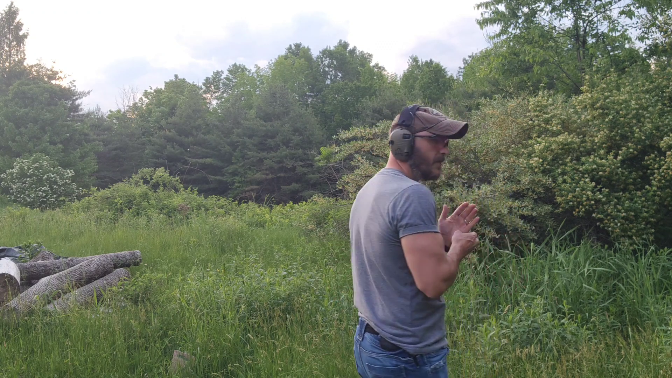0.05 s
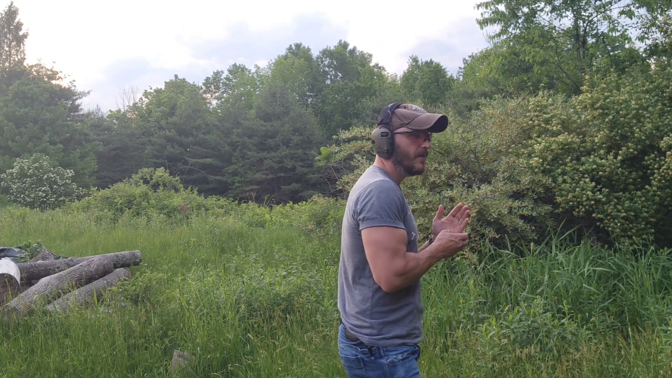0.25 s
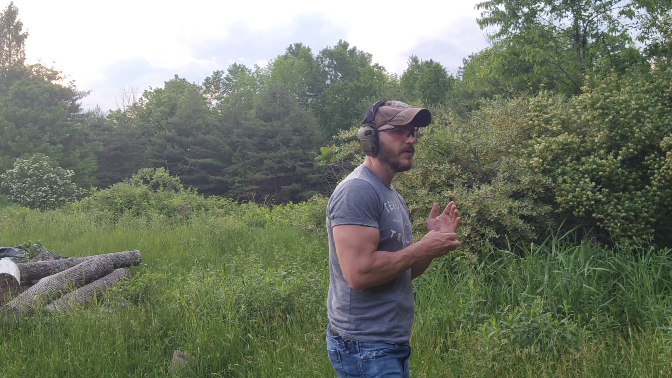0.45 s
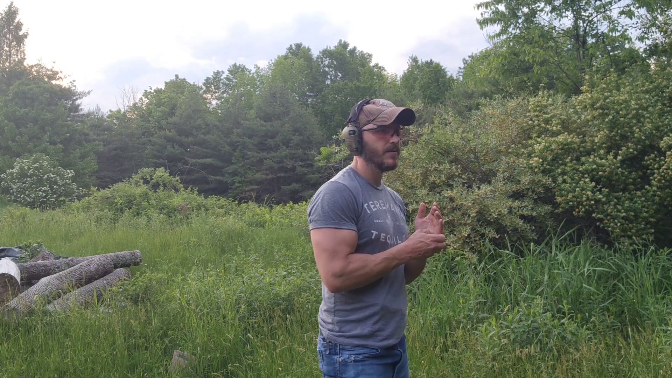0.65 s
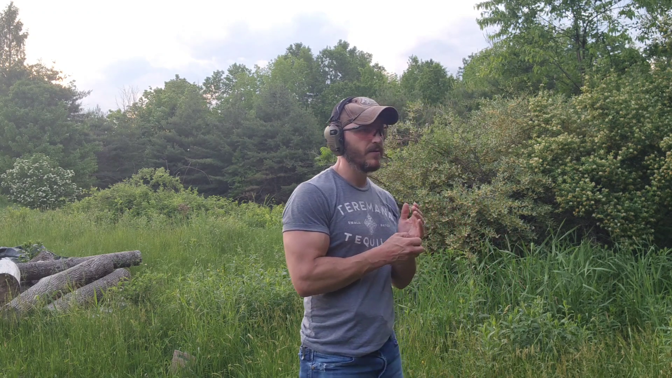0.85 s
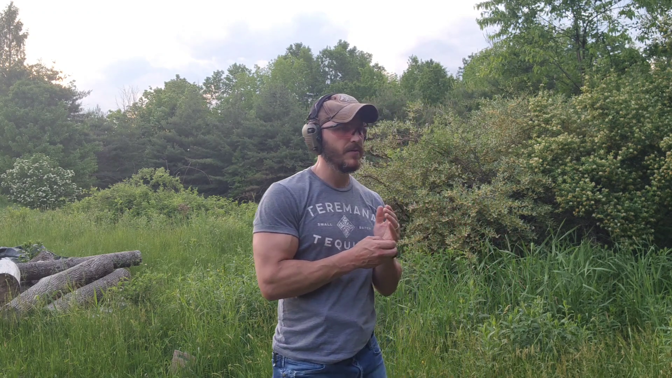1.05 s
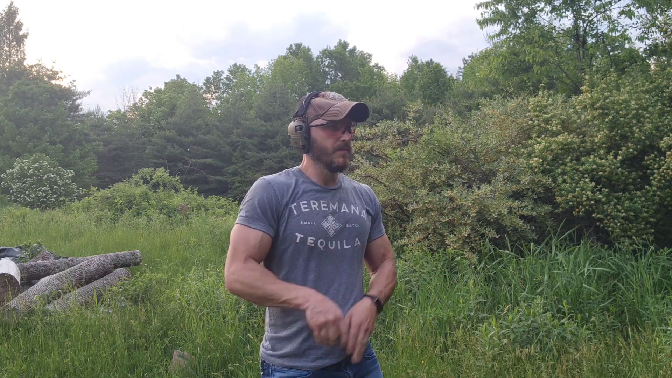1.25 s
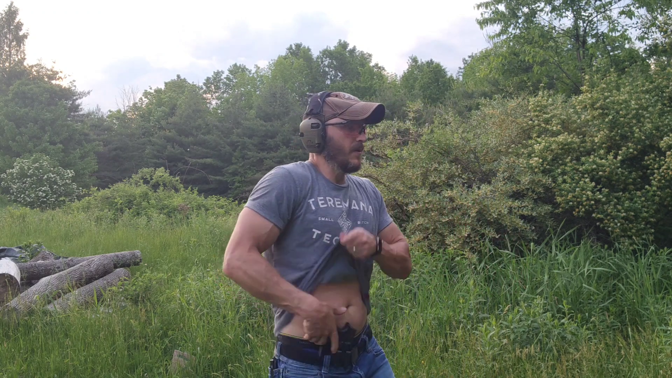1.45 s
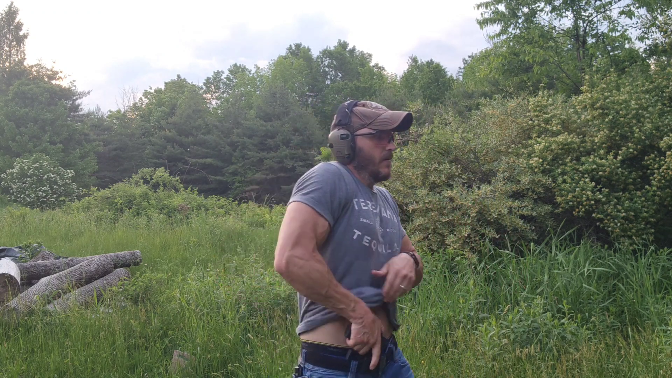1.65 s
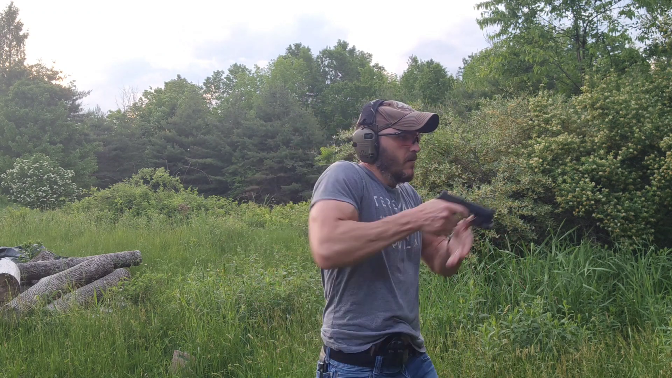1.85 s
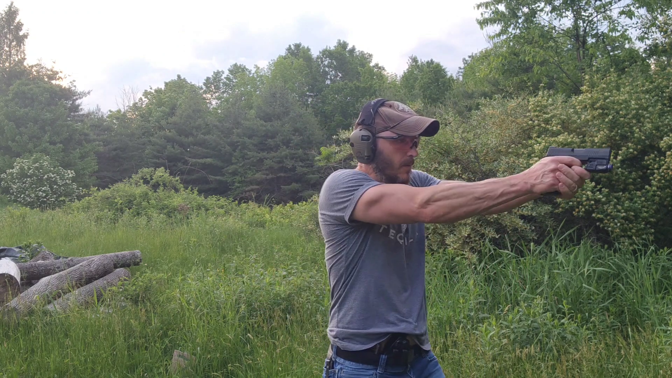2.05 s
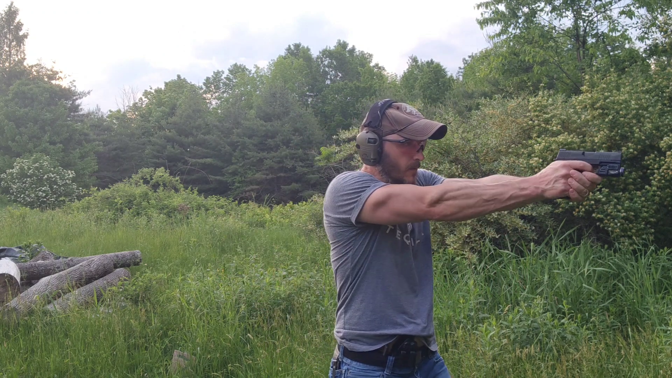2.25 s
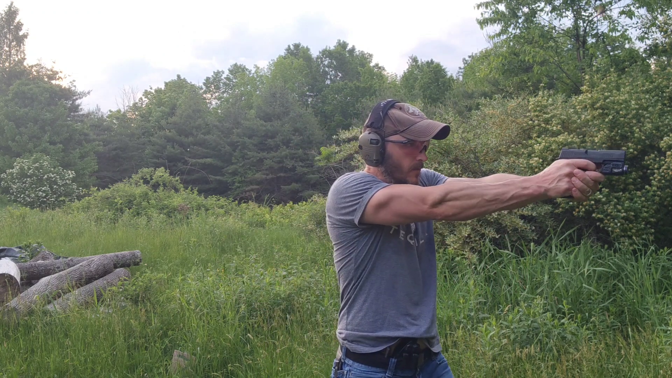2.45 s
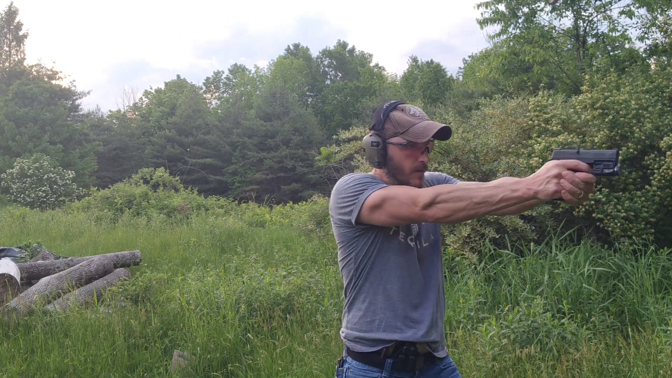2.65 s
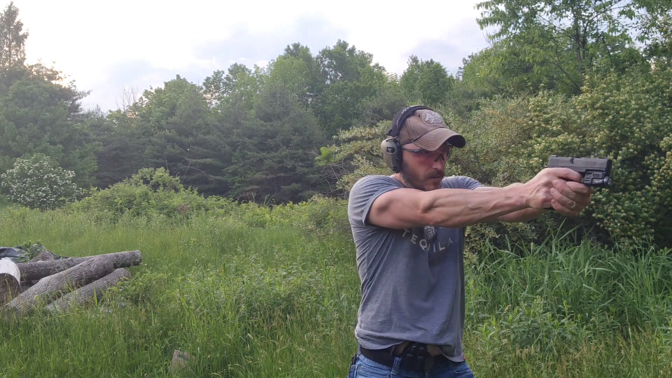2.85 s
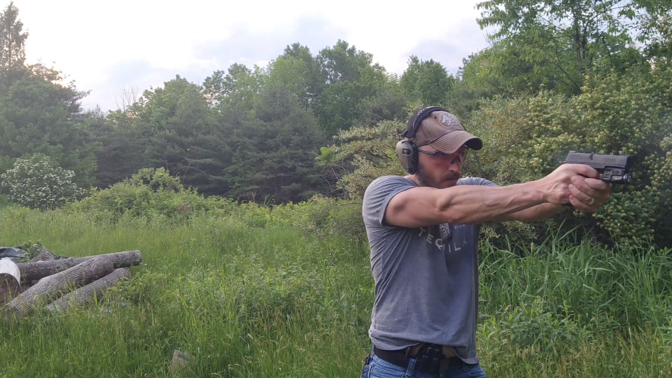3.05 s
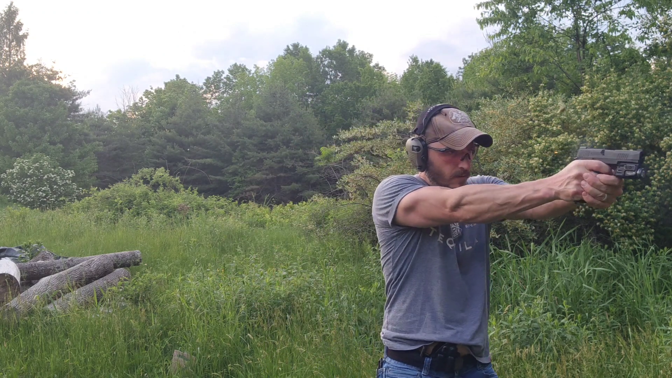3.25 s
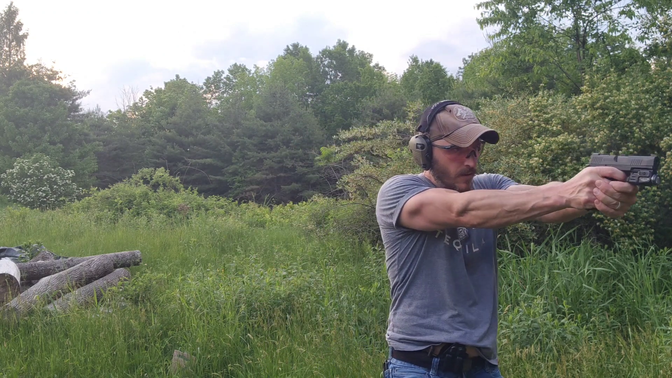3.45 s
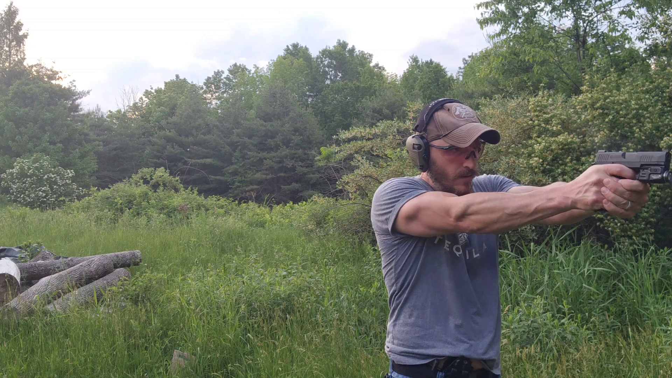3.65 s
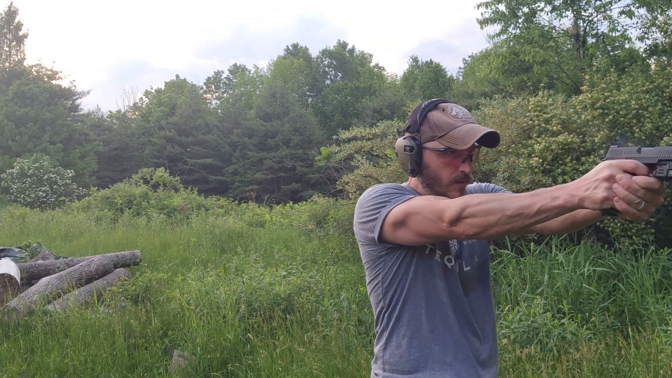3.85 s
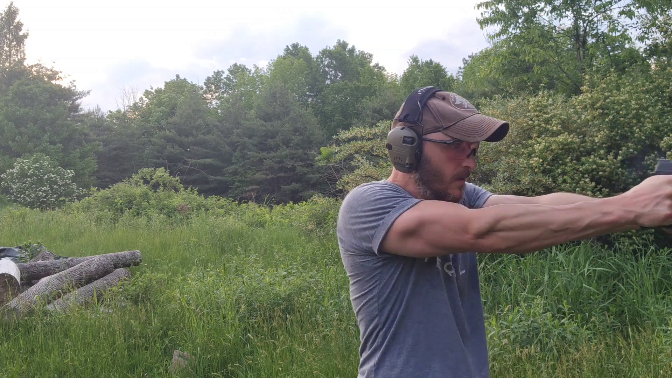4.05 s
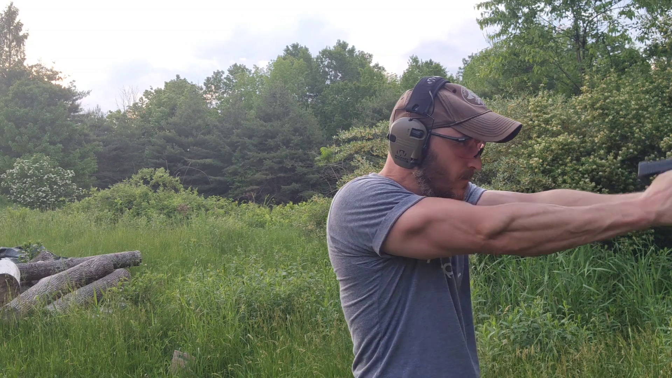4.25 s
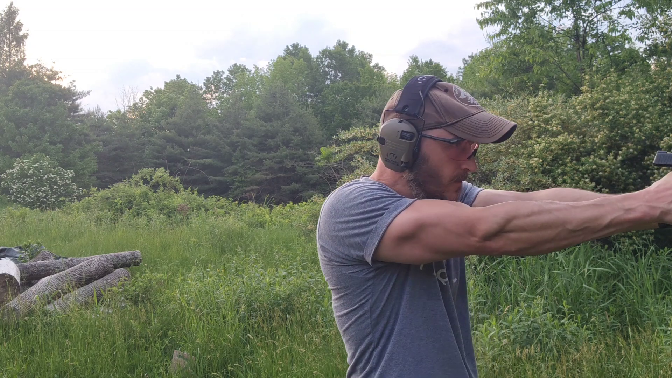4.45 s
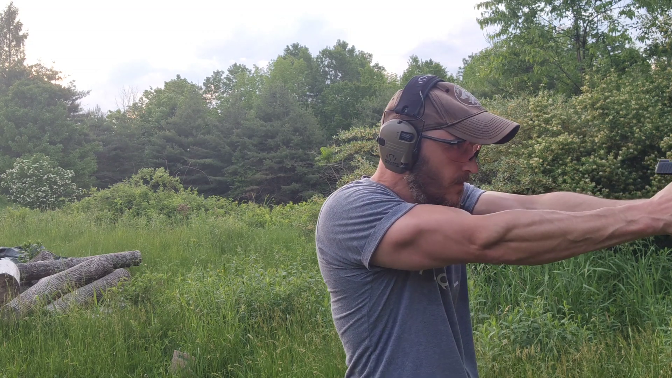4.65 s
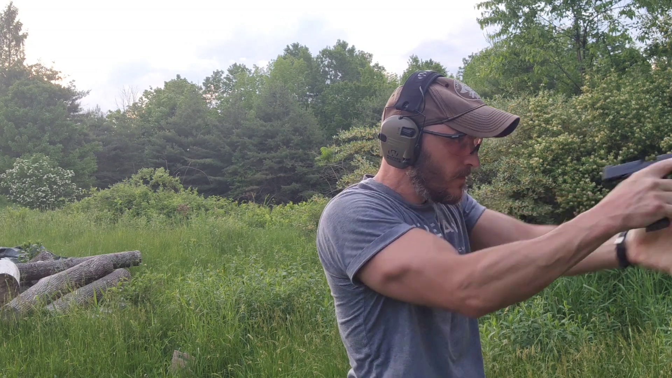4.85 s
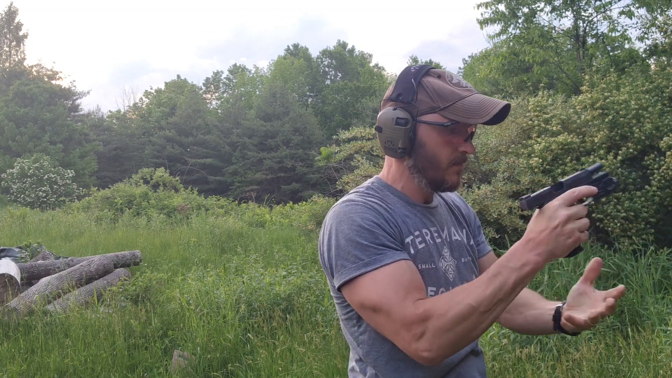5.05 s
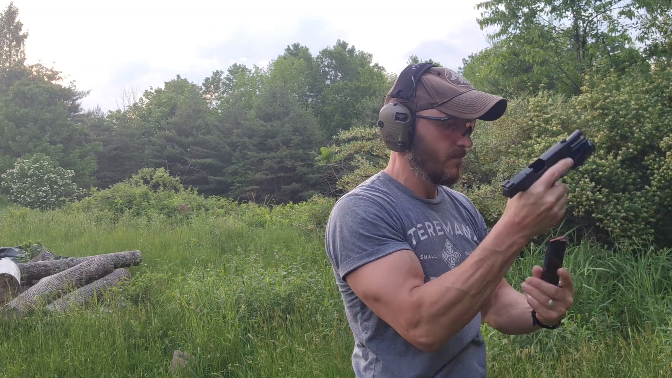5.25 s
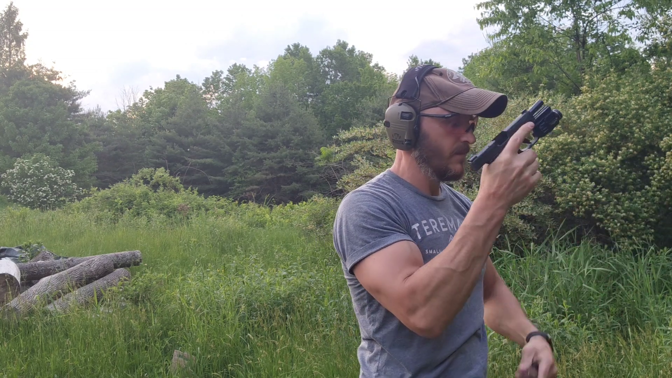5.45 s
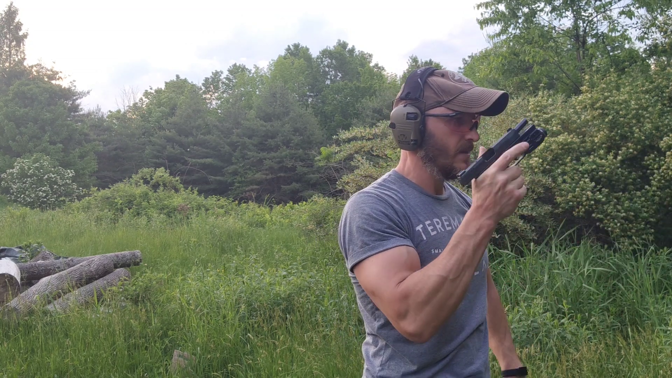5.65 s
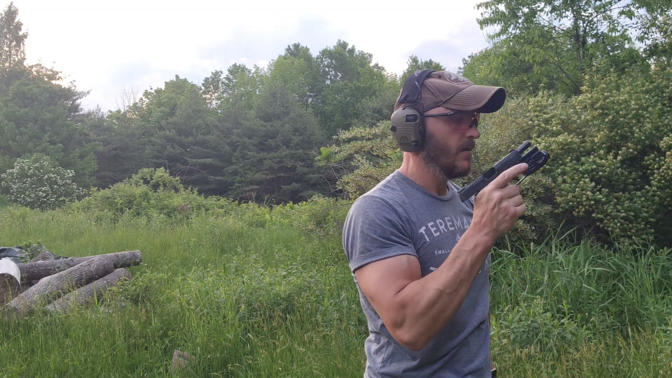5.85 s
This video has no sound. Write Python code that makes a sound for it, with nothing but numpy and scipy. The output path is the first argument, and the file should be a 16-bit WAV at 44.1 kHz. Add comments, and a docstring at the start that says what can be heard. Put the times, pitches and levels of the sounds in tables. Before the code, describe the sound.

In a tree-ringed meadow, soft fabric rubbing and hollow plastic-like clacks precede a quick, slightly uneven string of seven pistol reports. Each has a hard crack, a low thump stronger on the right and a noisy woodland return. The last tail decays under a few light metal clicks. The nearby small stereo microphone clips, its gain dropping at once and recovering slowly.

```python
"""In a meadow ringed by trees, seven pistol shots are fired close to a small stereo camera.
Each is a shock front with gas noise; bushes, trunks, banks, trees and slopes return it as decaying noise and rings.
Before them the gun scrapes and knocks out of a stiff holster; ticks of magazine and slide follow the fourth and last.
A far engine drones as wavering sines, cloth rustles as swelling noise, and open air hushes softly.
The camera's gain drops at once on loud peaks and creeps back."""
import sys
import numpy as np
from scipy import signal
from scipy.fft import rfft, irfft, next_fast_len
from scipy.io import wavfile
from scipy.ndimage import uniform_filter1d, map_coordinates

SR = 44100
rng = np.random.default_rng(int(sys.argv[2]) if len(sys.argv) > 2 else 0)


def store_wav(level_fs):
    """Save 16-bit WAV to argv[1]."""
    pcm = np.round(np.clip(np.atleast_2d(level_fs), -1, 1) * 32767)
    wavfile.write(sys.argv[1], SR, pcm.T.astype(np.int16))


N = 260631
T = np.arange(N) / SR  # time axis, s

# Shots: [t/s, report level/dB, body shelf level/dB, right-port thump level/dB, thump f/Hz,
#         low swell level/dB, bright swell level/dB, swell duration t/s]
SHOT_ROWS = [(2.3666, 12, 0.5, 6.5, 210, 10.5, 0.5, .03), (2.5567, 9.5, -5, -10.5, 240, -23, -3, .012),
             (3.028, 7, 1.5, 10, 198, -4.5, -5, .014), (3.2456, 6, 0.5, 6, 111, 1, -19.5, .014),
             (3.567, 7, 5, 8.5, 174, -7, -12.5, 0.014), (3.8127, 6.5, 2.5, 5, 126.2, -14.5, -11, 0.0091),
             (4.2884, 5, 5, 7.5, 180, -4.5, -11, 0.019)]
# Trunks and banks, and the nearest reflector: [delay t/s, level/dB, left-right level/dB]
TRUNK_ECHOES = [(0.048, -2, 7.5), (.082, 7.5, -1), (.1205, 10, 1), (.128, 2.5, 1), (.149, 6, -1.5),
                (.167, -0.5, 3), (.21, 3, 5), (.227, 3, 7), (.248, 2.5, -1.5)]
NEAREST_ECHO = (0.0197, 7.9, 13)
# Scattered sound, from muzzle gas and bushes to trees, far wood edge and distant slopes:
# [f/Hz, level/dB, decay t60/s, left-right level/dB]
BLAST_DECAY = [(100, -17, 0.18, -17), (550, -2, 0.056, 6.5), (2000, -3.5, 0.039, -2.5),
               (4485, -9.5, 0.092, 9), (7100, -15, 0.062, 0.5), (16000, -8, 0.09, 5.5)]
BUSH_DECAY = [(100, -24.5, 1, 1), (496, -14.5, 0.27, -9), (2060, -14, 0.48, 13), (5300, -2.5, 0.28, 1.5),
              (16000, -3.5, 0.2, 0)]
TREE_DECAY = [(40, -41, 4, 1), (112, -25, 1.2, -7.5), (312, -14.5, 1.1, 3.5), (554, -17.5, 3.4, 0.5),
              (960, -18.5, 2.85, 2.5), (1540, -29, 2.6, 2), (2280, -27.5, 1.96, 6.5),
              (5100, -25.5, 1.57, 8), (8250, -25.5, 0.92, -4.5), (16024, -28.5, .6, 6)]
EDGE_DECAY = [(297.6, -52, 0.9, 3.5), (997, -50, 0.83, -15), (3130, -41.5, 0.97, 15.5),
              (5640, -40, 0.35, 0), (8000, -54.5, 0.35, -3.5), (16000, -59.5, .5, 5)]
HILL_DECAY = [(60, -61.5, 5.4, -10.5), (150, -56, 7.9, 1), (353, -36.5, 6.01, -2), (600, -30.5, 1.2, -1),
              (1190, -42, 2.9, 3), (3300, -44.5, 4.4, 4.5), (7500, -56.5, 4.8, 1.5), (16040, -74, 3, 1)]
# Left-right correlation of diffuse sound: [f/Hz, correlation/1]
COHERENCE = [(60, 0.82), (180, 1), (550, 0.32), (1650, -0.08), (4970, 0.04), (15000, -0.01)]
# Holster contacts: [t/s, level/dB, main decay t60/s, favoured ring f/Hz, brightness level/dB]
HOLSTER_CONTACTS = [(0.153, -57.5, 0.092, 900, 4.5), (0.196, -53.5, 0.036, 1200, 7),
                    (1.3283, -23.5, 0.028, 1520, 3), (1.3429, -23.5, 0.03, 1410, 3),
                    (1.385, -43.5, 0.044, 1950, -14.5), (1.623, -42.5, 0.053, 1050, -13),
                    (1.761, -24, 0.071, 1610, -2.5), (1.77, -14, 0.039, 1820, -4),
                    (1.795, -22, 0.027, 1520, 3.5), (1.799, -20.5, 0.025, 1590, 0.5),
                    (1.87, -41, 0.036, 3100, 1), (1.9599, -29, 0.0344, 1800, 6),
                    (1.818, -43.5, 0.028, 1500, -4), (2.009, -45, 0.025, 2020, -4),
                    (2.311, -56, 0.016, 1180, 2)]
# Magazine and slide ticks: [t/s, level/dB, decay t60/s, favoured ring f/Hz]
STEEL_TICKS = [(3.488, -23.5, 0.023, 12100), (4.74, -46, 0.028, 12790), (4.955, -37.5, 0.025, 6600),
               (5.266, -36, 0.027, 4970), (5.298, -49, .02, 6000), (5.506, -51, 0.017, 7400),
               (5.724, -37, 0.12, 6900), (5.872, -46, 0.019, 7300)]
# Resonances of the holster shell and of the gun steel: [f/Hz, width f/Hz, level/dB]
SHELL_MODES = [(553, 180, 2), (791, 190, 1.5), (1400, 510, -4.5), (2090, 120, 0), (2520, 400, -7.5),
               (3700, 350, -2.5)]
STEEL_MODES = [(4200, 840, 9), (5670, 150, 14), (6560, 600, -5), (7650, 500, 6), (8370, 490, 15.5),
               (13100, 5500, -3.5)]
# Gun sliding in the holster, and clothing rub: [t/s, level/dB]
SCRAPE_LEVELS = [(1.3, -78), (1.38, -63), (1.45, -92), (1.55, -73), (1.63, -73), (1.68, -84.5), (1.72, -61),
                 (1.76, -58.5), (1.83, -95.5)]
CLOTH_LEVELS = [(0.1, -79.5), (0.15, -65), (0.28, -74), (0.38, -66), (0.57, -69.5), (0.72, -64.5),
                (0.87, -75.5), (1.02, -83), (1.28, -81), (1.33, -70.5), (1.53, -63.5), (1.69, -71),
                (1.75, -63.5), (1.92, -73.5), (1.96, -67), (2.03, -71), (2.18, -80)]
# Relative noise spectra of rustle, fine hiss and open air: [f/Hz, level/dB per Hz]
RUSTLE_SPECTRUM = [(600, -30), (1500, -3.5), (3000, -15.5), (6000, -4), (8500, -0.5), (10000, -28.5)]
FINE_SPECTRUM = [(8000, -37), (10500, 2), (16000, -6.5)]
AIR_SPECTRUM = [(20, -15), (45, -13.5), (90, -11.5), (130, -21), (250, -29), (700, -35), (2200, -42.5),
                (3600, -38), (6400, -41), (9000, -60), (16000, -70.5)]
# Engine tones: [f/Hz, wander f/Hz, rms level/dB]
ENGINE_TONES = [(48.5, 2.7, -68.5), (66.6, 1.7, -61.5)]
# Microphone port colour: [f/Hz, level/dB]
PORT_COLOUR = [(22, -7.5), (55, 5), (2200, 2.5), (2750, 0), (3500, 3.5), (4150, 4), (4600, 8.5), (5050, 4),
               (6000, 2), (7300, 7), (8300, -3.5), (9700, -16), (11000, -7.5), (13000, -3), (15700, -5),
               (16000, -23.5), (16900, -21.5)]

BOUNCE_HZ, BOUNCE_WIDTH_HZ = 673, 430
ECHO_HZ, ECHO_WIDTH_HZ = 556.6, 170
HOLSTER_PAN_DB, PAN_SCATTER_DB = 0.1, 2.7
AFTER_HISS_DB, AFTER_HISS_T60_S = -35.5, .3  # fine hiss that trails a contact
FINE_AT_DB, FINE_DB, FINE_GROWS = -64.5, -58.5, 2.3  # fine hiss swings wider than the rustle
TOP_HZ = 16950


def amp(db):
    """Level law: amplitude gain is ten to the power dB/20."""
    return 10 ** (np.asarray(db) / 20)


def unit(x):
    """Normalization: scale a signal to an rms of one."""
    return x / np.sqrt(np.mean(x ** 2) + 1e-20)


def along(rows, hz, axis=1):
    """Interpolation of one table column on a logarithmic frequency axis."""
    cols = np.transpose(rows)
    return np.interp(np.log(hz + 1), np.log(cols[0] + 1), cols[axis])


def sides(pan_db):
    """Intensity stereophony: a level difference shared equally between left and right."""
    return amp(np.array([pan_db, -pan_db]) / 2)


def filtered(x, response):
    """Linear filtering: multiply the spectrum by a frequency response."""
    m = next_fast_len(x.shape[-1] + 8192)  # padding keeps tails from wrapping round
    spectrum = rfft(x, m) * response(np.fft.rfftfreq(m, 1 / SR))
    return irfft(spectrum, m)[..., :x.shape[-1]]


def mode(hz, centre_hz, width_hz):
    """Resonance: causal second-order band-pass response of a damped oscillator."""
    return 1j * hz * width_hz / (centre_hz ** 2 - hz * hz + 1j * hz * width_hz)


def wobble(rate, size):
    """Slow random modulation: a spline through `rate` random knots a second."""
    knots = rng.standard_normal(int(size * rate / SR) + 4)
    return map_coordinates(knots, [np.arange(size) * rate / SR])


def diffuse(size, level):
    """Diffuse field: stereo noise, coherent in the bass and unrelated in the treble."""
    def mid_side_gain(hz):
        angle = np.arccos(np.clip(along(COHERENCE, hz), -1, 1)) / 2
        return level(hz) * [np.cos(angle), np.sin(angle)]

    mid, side = filtered(rng.standard_normal((2, size)), mid_side_gain)
    return np.array([mid + side, mid - side])


def spectral_noise(size, spectrum):
    """Coloured diffuse noise: a tabulated spectrum at unit rms."""
    return unit(diffuse(size, lambda hz: amp(along(spectrum, hz))))


def dying(table, size, hold=0, patchy_db=0):
    """Reverberant decay: after a hold each band fades at its own rate, in uneven patches."""
    noise = diffuse(size, lambda hz: amp(along(table, hz)))
    hz, t, z = signal.stft(noise, SR, nperseg=256)
    patches = uniform_filter1d(rng.standard_normal(z.shape[1:]), size=5, axis=0)
    patches = unit(uniform_filter1d(patches, size=16, axis=1))
    t60 = along(table, hz, axis=2)[:, None]
    fade = amp(patchy_db * patches - 60 * np.maximum(t - hold, 0) / t60)
    pan = sides(along(table, hz, axis=3))[..., None]
    return signal.istft(z * fade * pan, SR, nperseg=256)[1][:, :size]


def onset(t, rise_s):
    """Exponential build-up with time constant rise_s."""
    return 1 - np.exp(-t / rise_s)


def struck(modes, ring_hz, slope_db=9):
    """Modal excitation: the spot hit favours modes near ring_hz, by slope_db an octave."""
    def response(hz):
        total = 0
        for k, (centre_hz, width_hz, db) in enumerate(modes):
            gain = amp(db - slope_db * abs(np.log2(centre_hz / ring_hz)))
            total = total + (-1) ** k * gain * mode(hz, centre_hz, width_hz)
        return (1j * hz / (450 + 1j * hz)) ** 2 * total  # a small body radiates little bass

    return response


def add(bus, s, sound):
    """Superposition: mix a sound in from second s."""
    part = bus[:, round(s * SR):][:, :sound.shape[1]]
    part += sound[:, :part.shape[1]]


def shots():
    """Superposition of direct blast, early reflections, reverberation and port pressure."""
    bus, size = np.zeros((2, N)), N // 2 + SR
    t = T[:size]
    short = t[:SR // 2]
    wave = shock_front(short[:SR // 10])
    returns = reflections(wave, len(short))
    near = short < .035  # the first bounce belongs to the body of the shot
    clumps = amp(2.26 * wobble(40, size))  # the same trunks answer every shot
    for s, db, body_db, thump_db, thump_hz, low_db, bright_db, swell_s in SHOT_ROWS:
        report = landscape(t, clumps)
        report[:, :len(short)] += muzzle_blast(wave, near * returns, body_db)
        report[:, :len(short)] += dying(BUSH_DECAY, len(short), patchy_db=1.5) + ~near * returns
        add(bus, s, amp(db) * report)
        add(bus, s, amp(thump_db) * port_thump(short, thump_hz))
        add(bus, s - swell_s, swell(short, thump_hz, low_db, bright_db, swell_s))
    return bus


def shock_front(t):
    """Blast wave: a pressure step decays through zero into suction."""
    u = t / 0.00017
    return (1 - u) * np.exp(-u)


def muzzle_blast(wave, near_returns, body_db):
    """Direct radiation: shock front and turbulent muzzle gas, with a shelf on the lows."""
    size = near_returns.shape[1]
    crackle = amp(np.array([wobble(730, size), wobble(900, size)]))  # turbulent gas
    blast = crackle * dying(BLAST_DECAY, size, hold=0.018, patchy_db=0.5) + near_returns
    blast[:, :len(wave)] += amp(0.5) * wave
    return filtered(blast, lambda hz: 1 + (amp(body_db) - 1) / (1 + 1j * hz / 2000))


def reflections(wave, size):
    """Discrete reflection: rough surfaces dull the blast wave to short, delayed rings."""
    returns = np.zeros((2, size))
    wide = filtered(wave, lambda hz: mode(hz, BOUNCE_HZ, BOUNCE_WIDTH_HZ) ** 2)
    narrow = filtered(wave, lambda hz: mode(hz, ECHO_HZ, ECHO_WIDTH_HZ) ** 2)
    for (delay, db, pan_db), ring in [(NEAREST_ECHO, wide)] + [(echo, narrow) for echo in TRUNK_ECHOES]:
        add(returns, delay, amp(db) * sides(pan_db)[:, None] * ring)
    return returns


def landscape(t, clumps):
    """Multiple scattering: trees, slopes and a late wood edge build up and die away."""
    size = len(t)
    report = clumps * onset(t, 0.015) * dying(TREE_DECAY, size, patchy_db=2.0)
    report += onset(t, .3) * dying(HILL_DECAY, size)
    add(report, .45, onset(t, 0.26) * dying(EDGE_DECAY, size, hold=.25, patchy_db=3))
    return report


def port_thump(t, thump_hz):
    """Forced oscillation: the pressure step rocks each port, most the right one facing the muzzle."""
    def resonance(hz):
        low_cut = 1j * hz / (60 + 1j * hz)
        return mode(hz, thump_hz, thump_hz) * mode(hz, thump_hz, 3 * thump_hz) * low_cut

    thump = filtered(rng.standard_normal((2, len(t))) * amp(-60 * t / .07), resonance)
    return thump / np.abs(thump).max(axis=1, keepdims=True) * amp([[-11], [0]])


def swell(t, thump_hz, low_db, bright_db, swell_s):
    """Band noise under a square-law rise to the crack, low on the right and brighter on the left."""
    rise = np.clip(t / swell_s, 0, 1) ** 2.0 * (t < swell_s)
    low = unit(filtered(rng.standard_normal(len(t)),
                        lambda hz: mode(hz, 1.1 * thump_hz, 270) / (1 + 1j * hz / 600)))
    bright = unit(filtered(rng.standard_normal((2, len(t))), lambda hz: mode(hz, 2400, 2700)))
    low_part = amp(low_db) * amp([[-14], [0]]) * low
    bright_part = amp(bright_db) * amp([[0], [-4]]) * bright
    return rise * (low_part + bright_part)


def handling():
    """Impact and friction: contacts and a scrape excite the holster shell, ticks the gun steel."""
    bus, t = np.zeros((2, N)), T[:SR // 4]
    for s, db, t60, ring_hz, bright_db in HOLSTER_CONTACTS:
        add(bus, s, amp(db) * holster_contact(t, t60, ring_hz, bright_db))
    for s, db, t60, ring_hz in STEEL_TICKS:
        burst = rng.standard_normal((2, len(t))) * amp(-60 * t / t60)
        add(bus, s, amp(db) * filtered(burst, struck(STEEL_MODES, ring_hz, slope_db=13)))
    return bus + holster_scrape()


def holster_contact(t, t60, ring_hz, bright_db):
    """Impact excitation: a hard touch and a decaying rattle ring the shell, with a bright tick."""
    shape = onset(t, 0.039 * t60) * (amp(-60 * t / t60) + amp(-23.5 - 60 * t / 0.22))
    rattle = rng.standard_normal((3, len(t))) * shape * amp(2 * wobble(450, len(t)))
    rattle += 1.97 * np.exp(-((t - .0006) / .00006) ** 2)  # the first hard touch
    shell = 3 * filtered(rattle[0], struck(SHELL_MODES, ring_hz, slope_db=10.5))
    tick = filtered(rattle[1:], lambda hz: mode(hz, 7200, 2000) + 0.24 * mode(hz, 7300, 12000))
    hiss = amp(AFTER_HISS_DB - 60 * t / AFTER_HISS_T60_S) * spectral_noise(len(t), FINE_SPECTRUM)
    place = sides(HOLSTER_PAN_DB + PAN_SCATTER_DB * rng.standard_normal())[:, None]
    return place * (shell + amp(bright_db) * (tick + hiss))


def holster_scrape():
    """Friction: sliding drives the shell modes with noise of uneven level."""
    level_db = np.interp(T, *np.transpose(SCRAPE_LEVELS), left=-120, right=-120) + 3 * wobble(68, N)
    return amp(level_db) * unit(filtered(rng.standard_normal(N), struck(SHELL_MODES, 1300)))


def clothing():
    """Fabric friction: rustle and fine hiss swell together, the hiss over a wider range."""
    rustle_db = np.interp(T, *np.transpose(CLOTH_LEVELS))
    fine_db = FINE_DB + FINE_GROWS * (rustle_db - FINE_AT_DB)
    rustle = amp(rustle_db) * spectral_noise(N, RUSTLE_SPECTRUM)
    fine = amp(fine_db) * spectral_noise(N, FINE_SPECTRUM)
    return amp(1.1 * wobble(48, N)) * (rustle + fine)


def engine_drone():
    """Frequency and amplitude modulation: low tones waver in pitch and strength."""
    drone = np.zeros(N)
    for hz, wander_hz, db in ENGINE_TONES:
        cycles = hz * T + np.cumsum(wander_hz * wobble(2.3, N)) / SR
        drone += amp(db) * unit(np.sin(2 * np.pi * cycles) * amp(2.0 * wobble(9.1, N)))
    return drone


def open_air():
    """Ambient noise: a diffuse hush with slight slow changes of level."""
    return amp(-65.5 + 0.47 * wobble(2.7, N)) * spectral_noise(N, AIR_SPECTRUM)


def scene():
    """Superposition of all sources at the camera."""
    return shots() + handling() + clothing() + engine_drone() + open_air()


def record(dry):
    """Transduction: port colour, gain control, converter noise, soft clipping and band limit."""
    # folding the cepstrum gives the port a minimum-phase response
    cep = irfft(np.log(amp(along(PORT_COLOUR, np.fft.rfftfreq(2048, 1 / SR)))))
    cep[1:1024], cep[1025:] = 2 * cep[1:1024], 0
    port = irfft(np.exp(rfft(cep)))
    x = signal.fftconvolve(dry, port[None], axes=1)[:, :N]
    # gain drops at once, by 17 dB at most, and creeps back at 0.5 dB/s
    need_db = np.clip(-6 - 20 * np.log10(np.abs(x).max(axis=0) + 1e-9), -17, 0)
    creep_db = .5 * T
    x = x * amp(np.minimum(0, creep_db + np.minimum.accumulate(need_db - creep_db)))
    x += amp(-91) * rng.standard_normal(x.shape)  # converter noise
    x = x / (1 + np.abs(x / .95) ** 4) ** (1 / 4)  # soft clipping
    return filtered(x, lambda hz: hz < TOP_HZ)


dry = scene()
out = record(dry)
store_wav(out)
```